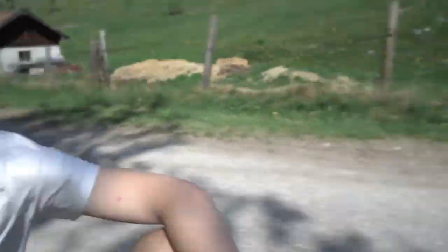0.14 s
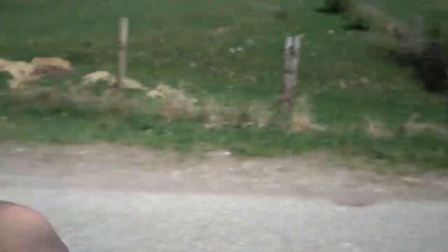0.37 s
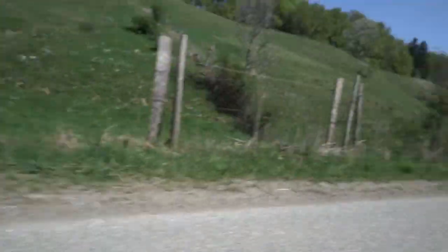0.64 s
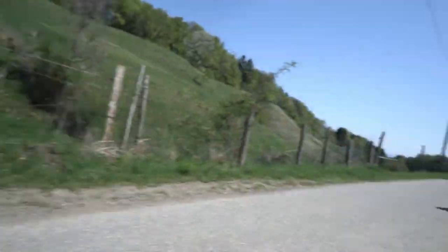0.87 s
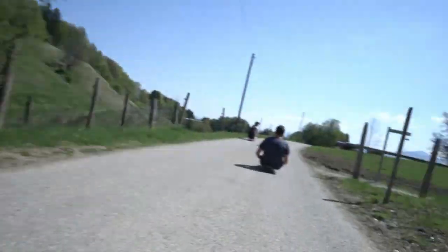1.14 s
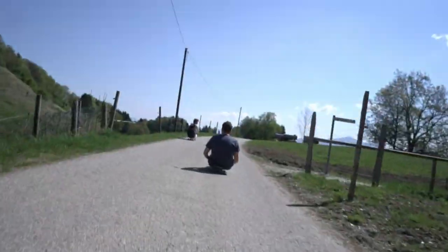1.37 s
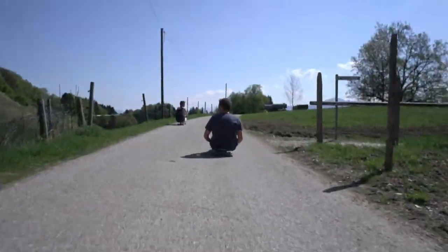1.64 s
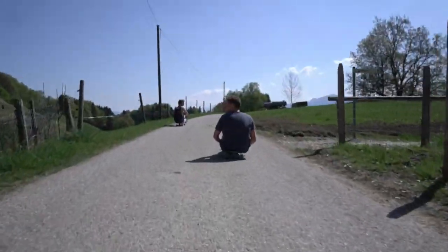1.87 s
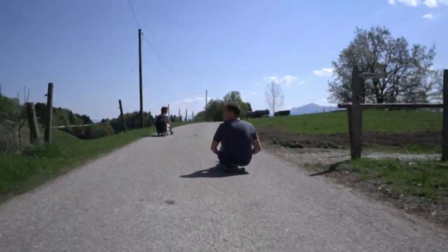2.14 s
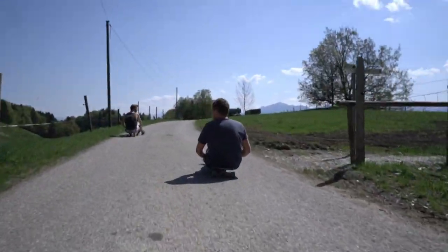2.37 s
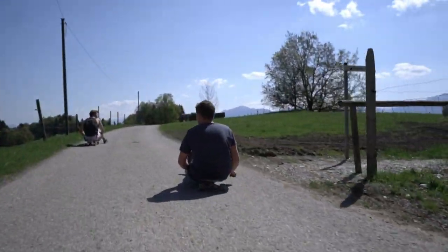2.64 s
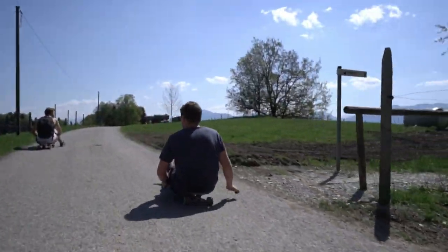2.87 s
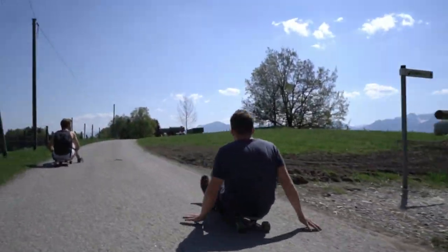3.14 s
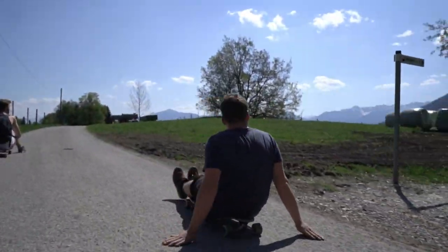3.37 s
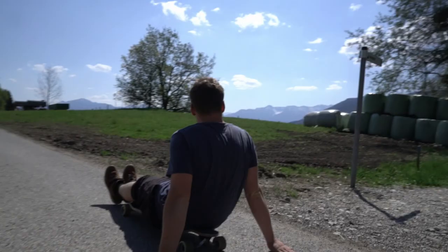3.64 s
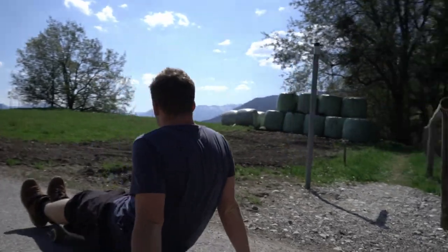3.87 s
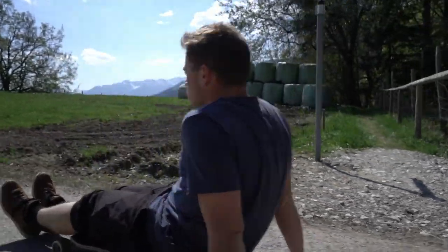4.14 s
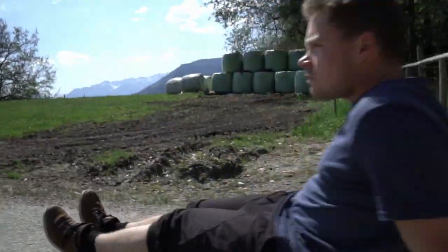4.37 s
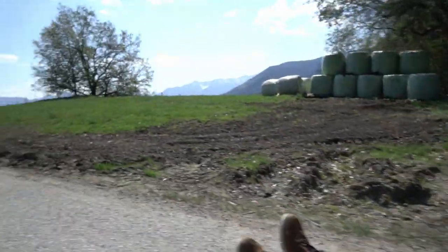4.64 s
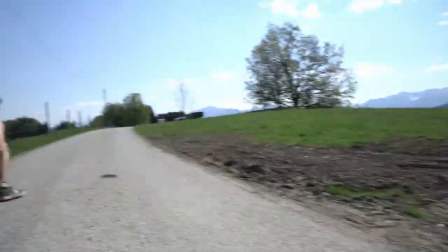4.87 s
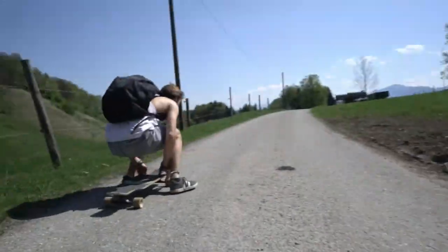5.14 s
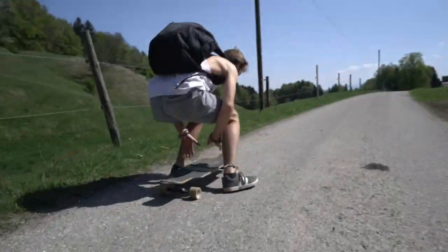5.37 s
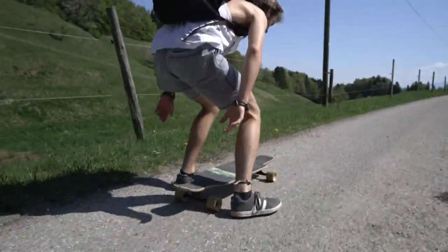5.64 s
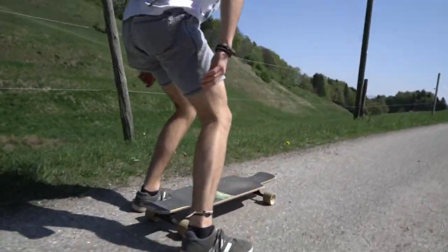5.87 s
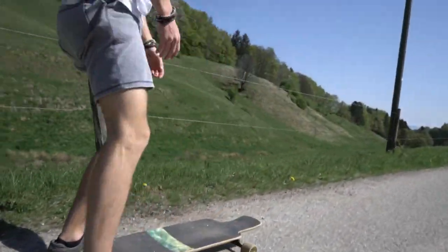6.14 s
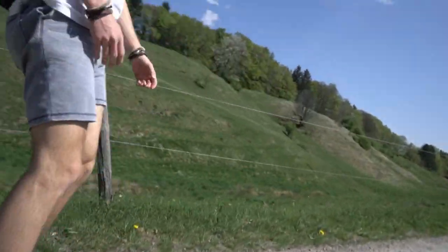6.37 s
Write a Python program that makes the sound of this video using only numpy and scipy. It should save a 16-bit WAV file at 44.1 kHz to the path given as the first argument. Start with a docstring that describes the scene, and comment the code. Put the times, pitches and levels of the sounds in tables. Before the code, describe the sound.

Close, wind-blasted stereo sound from a moving longboard in open country, without echo. Low lumpy roar and ragged gusts surge and sag, with loud pops on one side or the other. The hollow deck drums steadily over stony road. A cluster of bumps comes mid-ride, then a faint airy scuff with thin whistle, a brief lull in rolling, and finally coarse rattle, grit ticks and metallic knocks.

```python
"""Open country, coarse asphalt: a camera with two microphone ports rides along on a longboard.
Wind bursts, pops and roars on the ports: filtered patter and noise, pressure steps and low noise.
Road stones and bumps are random clicks and short jolts that ring the deck, trucks and bearings.
Grit hisses and ticks under the treads as coloured noise and short puffs.
Nearby, another board scuffs and whistles past, and late on one rattles alongside."""
import sys
import numpy as np
from scipy import signal
from scipy.io import wavfile
from scipy.ndimage import uniform_filter1d

SR = 44100
rng = np.random.default_rng(int(sys.argv[2]) if len(sys.argv) > 2 else 0)


def nominal_scale(level):
    """Amplitude ratio for a level in decibels (scalar or array-like)."""
    x = np.asarray(level, float) / 20
    return 10 ** x


def persist_wave(psi):
    """Save psi, clipped to +-1, as 16-bit WAV."""
    counts = np.round(np.clip(psi, -1, 1) * 32767).astype(np.int16)
    wavfile.write(sys.argv[1], SR, np.atleast_2d(counts).T)


N = 286647

# resonances of the deck: f/Hz, width/Hz, level/dB
DECK_MODES = [(322, 63, 3.5), (567, 92, 5), (610.3, 142, -1.5), (787, 11.3, -5), (968, 163, -10.5)]
# rattle resonances of the bearings: f/Hz, width/Hz, level/dB
BEARING_MODES = [(2530, 400, 17.5), (2740, 860, 16)]
# eddies are sharp while the camera stands side-on to the wind:
# t/s, sharpness/(dB per octave, well above 300 Hz)
EDDY_SHARPNESS = [(0.0, -3), (0.3, -4), (0.7, 0.5), (1.6, -4.5), (1.8, -9.5), (4.0, -16.5), (4.8, -13),
                  (5.3, -7), (6.5, -26)]


def evened(x):
    """Scales to rms 1."""
    return x / np.sqrt(np.mean(x ** 2) + 1e-20)


def read(points, hz):
    """Reads a spectrum on a log-frequency axis."""
    f, value = np.transpose(points)
    return np.interp(np.log(hz + 1), np.log(f + 1), value)


def curves(rows, t):
    """Every column of a table at the times t."""
    s, *columns = np.transpose(rows)
    return [np.interp(t, s, column) for column in columns]


def panned(x, pan_db):
    """Two channels, the left pan_db stronger relative to the right."""
    return x * nominal_scale(np.array([[pan_db / 2], [-pan_db / 2]]))


def add(mix, s, sound):
    """Adds a two-channel sound at time s."""
    part = mix[:, round(s * SR):][:, :sound.shape[1]]
    part += sound[:, :part.shape[1]]


def resonate(x, hz, *widths):
    """Shifts the curve hz down to zero, smooths, and shifts back: a resonance of gain 1."""
    turn = np.exp(2j * np.pi * np.cumsum(hz * np.ones(x.shape[-1])) / SR)
    low = x * turn.conj()
    for r in np.exp(-np.pi * np.array(widths) / SR):
        low = signal.lfilter([1 - r], [1, -r], low)
    return 2 * (turn * low).real


def ring(x, modes):
    """Excites steep-sided resonances side by side, each with its own level."""
    return sum(nominal_scale(db) * resonate(x, hz, w, 2 * w) for hz, w, db in modes)


def stones(per_s, spread_db, clump_s, clump_db):
    """Random clicks of either sign and uneven size, larger where the asphalt is coarser."""
    hit = (rng.random(N) < per_s / SR) * rng.choice([-1., 1.], N)
    coarse = evened(uniform_filter1d(rng.standard_normal(N), int(clump_s * SR)))
    size_db = spread_db * np.minimum(rng.exponential(1, N), 5)
    return evened(hit * nominal_scale(size_db + clump_db * np.clip(coarse, -2, 1.5)))


def shaped(colour_db, same, size, patch_db, flicker_db):
    """Two-channel noise from short-time spectra with patches and a flicker shared by all bins."""
    frames, hz = 4 * N // size + 5, np.fft.rfftfreq(size, 1 / SR)
    a, b, c, d, p = rng.standard_normal((frames, len(hz), 5)).T
    patches = evened(uniform_filter1d(uniform_filter1d(p, 9, 0), 7, 1))
    flicker = evened(uniform_filter1d(rng.standard_normal(frames), 4))
    same, left = np.clip(same, -1, 1), a + 1j * b
    right = same * left + np.sqrt(1 - same ** 2) * (c + 1j * d)
    z = np.array([left, right])
    z *= nominal_scale(colour_db(hz)[:, None] + patch_db * patches + flicker_db * flicker)
    return evened(signal.istft(z, nperseg=size, noverlap=3 * size // 4)[1][:, :N])


def passing(t):
    """A second board slides past: a wide treble scuff, a grainy scrape and a thin fuzzy whistle."""
    # the pass: t/s, scuff level/dB, scuff centre f/Hz, whistle level/dB
    pass_points = [(3.3, -90, 9000, -75), (3.6, -56, 10000, -66), (3.8, -68, 9500, -65),
                   (4.4, -61.5, 10900, -65.5), (4.5, -59, 10300, -62.5), (4.74, -60, 10200, -63),
                   (4.79, -53, 8040, -90), (4.87, -56, 8340, -91), (5.0, -42, 8980, -85),
                   (5.05, -78, 8800, -85)]
    scuff_db, hz, whistle_db = curves(pass_points, t)
    to_edge_s = np.minimum(t - pass_points[0][0], pass_points[-1][0] - t)
    near = np.clip(to_edge_s / 0.26, 0, 1)
    air = rng.standard_normal((2, N))
    scuff = evened(resonate(resonate(air, hz, 1800), hz, 2400))
    whistle = evened(resonate(air, 5400, 480, 720))
    grains = stones(per_s=450, spread_db=3, clump_s=0.015, clump_db=5)
    scrape = evened(ring(grains, BEARING_MODES))
    return near * (nominal_scale(whistle_db + 6.0) * scrape + nominal_scale(scuff_db) * scuff + nominal_scale(whistle_db) * whistle)


def alongside(t):
    """Coarse wheel rattle of another board that rolls up late: clicks ring its resonances."""
    # resonances of that board: f/Hz, width/Hz, level/dB
    other_modes = [(802, 51, 7.5), (1110, 260, -8.5), (1970, 620, -19)]
    road = np.array([stones(per_s=900, spread_db=5.0, clump_s=0.016, clump_db=4.5) for _ in "LR"])
    rattle = evened(ring(road + 0.42 * road[::-1], other_modes))
    approach = np.interp(t, (5.39, 5.48), (0, 1))
    return approach * nominal_scale(-41.5) * rattle


def hissing(t, coarse):
    """Treads grind grit: coloured noise and faint puffs, louder while another board is alongside."""
    # hiss of the treads: t/s, level/dB (before coarse patches)
    hiss_points = [(0.0, -53), (0.12, -54), (0.26, -57.5), (1.25, -59), (1.36, -62), (1.6, -60.5),
                   (1.7, -57.5), (2.4, -55), (3.6, -54.5), (4.3, -52.5), (4.78, -51), (4.88, -58),
                   (5.16, -59.5), (5.6, -56), (6.3, -54), (6.5, -57.5)]
    # colour of the hiss: f/Hz, relative level/(dB per Hz)
    grit_colour = [(1500, 1), (3000, -21), (4000, -12), (5300, -6.5), (6700, -7), (7500, 1), (8300, -3),
                   (10500, -4.5), (13300, -6.5), (15800, -10.5)]
    hiss_db = curves(hiss_points, t)[0] + 1.5 * coarse
    hiss = shaped(lambda hz: read(grit_colour, hz), same=0.083, size=256, patch_db=2.5, flicker_db=2.0)
    fine = np.array([stones(per_s=260, spread_db=2.5, clump_s=0.04, clump_db=3) for _ in "LR"])
    fine = fine + 0.5 * fine[::-1]
    band = signal.butter(2, [3800, 9000], "band", fs=SR, output="sos")
    fine = evened(signal.sosfilt(band, fine))
    puff = rng.standard_normal(90) * np.hanning(90)  # smears each click into a short puff
    fine = evened(signal.oaconvolve(fine, puff[None], "same"))
    near = np.exp(-((t - 5.55) / 0.29) ** 2)  # the other board close by, centre and spread in s
    crackle_boost_db, near_hiss_db, near_hz = 8, -62.5, 5300
    own = nominal_scale(hiss_db) * (hiss + 0.25 * fine * nominal_scale(crackle_boost_db * near))
    near_hiss = evened(resonate(resonate(hiss, near_hz, 1800), near_hz, 2400))
    return own + nominal_scale(near_hiss_db) * near * near_hiss


def ticks():
    """Flicked grit: short decaying puffs of noise, each around its own pitch."""
    # ticks: t/s, peak level/dB, centre f/Hz, left minus right/dB
    tick_rows = [(0.075, -26, 4000, -9), (0.352, -37, 10500, -10), (0.5312, -42, 10000, -8),
                 (0.543, -41, 11500, -6), (0.549, -38, 7740, -7), (1.037, -45, 3600, 3),
                 (4.45, -34, 2500, 3), (4.474, -37, 2600, 3), (4.495, -33, 2900, 3), (4.624, -33, 2500, 3),
                 (4.702, -30, 2450, 5), (4.7795, -40, 8000, 3), (4.795, -32, 10500, 6),
                 (5.1512, -37.5, 7260, -9), (5.641, -35, 4540, -2), (5.766, -38.5, 5360, 0),
                 (5.777, -35, 5200, 0), (5.793, -33, 5000, 0.0), (5.813, -24.5, 10800, -1),
                 (5.861, -36, 5500, -2), (5.902, -31.5, 4300, -5), (5.92, -34.5, 5300, -2),
                 (5.936, -39, 5900, 4), (5.994, -35.5, 5200, 0), (6.279, -31, 3400, -8),
                 (6.448, -36, 4570, -4), (6.4767, -36, 4940, -4)]
    mix = np.zeros((2, N))
    t = np.arange(500) / SR
    envelope = np.exp(-t / 0.003) * np.minimum(t / .0015, 1)
    noises = rng.standard_normal((len(tick_rows), 2, 500))
    for (s, db, hz, pan_db), noise in zip(tick_rows, noises):
        puff = (noise[0] + .5 * noise) * envelope  # partly alike on both ports
        tone = resonate(resonate(puff, hz, .35 * hz), hz, .5 * hz)
        tick = tone + 0.2 * np.diff(puff, prepend=0) + .12 * puff
        add(mix, s, panned(nominal_scale(db) * tick / abs(tick).max(), pan_db))
    return mix


def knocks():
    """Each bump is a short jolt: the deck booms, the trucks clink, grit sprays."""
    # bumps: t/s, deck peak level/dB, truck clink peak level/dB
    knock_rows = [(1.828, -15.5, -48), (2.186, -13.5, -38), (2.399, -12, -26), (2.607, -14.5, -41),
                  (2.655, -12.5, -53), (2.72, -16.5, -48), (2.746, -24, -39), (2.889, -16, -39),
                  (5.157, -15.5, -32), (5.596, -31, -47), (5.69, -18, -22), (5.712, -14, -31),
                  (5.813, -10.5, -19.5), (5.827, -9, -24), (6.186, -12, -33), (6.28, -13, -20),
                  (6.308, -15, -35), (6.375, -24, -32), (6.421, -15, -34), (6.432, -15, -32)]
    # trucks under a blow: f/Hz (before a random shift), width/Hz, level/dB
    clink_modes = [(910, 730, 7), (1485, 140, 17), (1870, 890, 6.5), (2900, 550, 4.5)]
    mix = np.zeros((2, N))
    t = np.arange(1600) / SR
    decay = np.exp(-t / .011)
    rise = np.minimum(t / .0012, 1)
    for (s, deck_db, clink_db), jolt in zip(knock_rows, rng.standard_normal((len(knock_rows), 1600))):
        blow = jolt * decay ** 1.27 * rise
        shifts = 0.01 * jolt.reshape(16, -1).sum(1) / 2  # no two blows land alike
        clink = [(hz * (1 + shift), w, db) for shift, (hz, w, db) in zip(shifts, clink_modes)]
        parts = ring(blow, DECK_MODES), ring(blow, clink), jolt * decay * rise
        levels_db = deck_db, clink_db, clink_db - 10.5  # the spray lies under the clink
        knock = sum(nominal_scale(db) * part / abs(part).max() for db, part in zip(levels_db, parts))
        add(mix, s, knock[None])
    return mix


def board(t, coarse):
    """Road stones and bumps strike the deck; trucks and bearings rattle along with them."""
    # rolling: t/s, deck drumming level/dB, bearing rattle level/dB (before coarse patches)
    roll_points = [(0.0, -28, -50), (0.25, -29.5, -54.5), (1.0, -29.5, -57), (1.5, -29, -62),
                   (1.8, -27, -56), (2.8, -28.5, -56), (3.25, -32, -56.5), (3.5, -30.5, -55.5),
                   (4.25, -29, -54), (4.75, -29.5, -56.5), (5.0, -33, -64), (5.25, -37.5, -64),
                   (5.5, -30.5, -50), (5.9, -33, -55), (6.25, -26.5, -54), (6.5, -33.5, -54.5)]
    # ring of the trucks: f/Hz (before the wander), width/Hz, level/dB
    truck_modes = [(1329, 162, 0)]
    drum_db, rattle_db = curves(roll_points, t)
    rattle_db = rattle_db + 2.5 * coarse
    road = stones(per_s=1000, spread_db=2.0, clump_s=0.016, clump_db=1.5)
    other = stones(per_s=1800, spread_db=-3.5, clump_s=0.041, clump_db=6.5)
    both = road + 0.029 * np.array([other, -other])

    # deck and trucks shift in pitch as the rider's weight moves
    wander_window = np.hanning(int(0.22 * SR))
    load = 1 + 0.032 * evened(signal.fftconvolve(rng.standard_normal(N), wander_window, "same"))
    drum_modes = [(hz * load, w, db) for hz, w, db in DECK_MODES]
    loaded_trucks = [(hz * load, w, db) for hz, w, db in truck_modes]
    drum = nominal_scale(drum_db) * evened(ring(road, drum_modes))
    trucks = nominal_scale(rattle_db + 8.5) * evened(ring(both, loaded_trucks))
    deck = drum + trucks + knocks()

    chatter = np.array([road, other - 0.25 * road]) + 0.27 * rng.standard_normal((2, N))
    rattle = nominal_scale(rattle_db) * evened(ring(chatter, BEARING_MODES))
    # the right port is 6 samples farther from the deck
    lagged = np.array([deck[0], np.pad(deck[1], (6, 0))[:N]])
    return panned(lagged + rattle, 2.0)


def gusts(t):
    """Level of the wind in dB: gusts snap up and sag, with random buffets."""
    # gusts: t/s, level/dB (before buffets)
    gust_points = [(0.0, -13), (0.98, -20.5), (1.0, -17), (1.68, -18.5), (1.74, -26.5), (2.1, -21),
                   (2.6, -29), (2.64, -22), (2.95, -32.5), (3.02, -17), (3.55, -27.5), (3.66, -21.5),
                   (4.4, -33), (4.76, -25.5), (4.8, -15.5), (4.88, -15.5), (4.92, -28.5), (5.01, -17),
                   (5.6, -20.5), (5.63, -17), (6.03, -26), (6.06, -18.5), (6.39, -31.5), (6.5, -24)]
    buffets = evened(uniform_filter1d(rng.standard_normal(N), int(0.043 * SR)))
    return curves(gust_points, t)[0] + 1.5 * buffets


def rumble(gust_db):
    """Large eddies press on both ports alike: a low lumpy roar that follows the gusts in part."""
    # colour of the roar: f/Hz, relative level/(dB per Hz)
    roar_colour = [(20, -57), (45, -6.5), (100, 0.5), (200, -1.5), (260, -9.5), (400, -12), (600, -34.5),
                   (1000, -95)]
    roar = shaped(lambda hz: read(roar_colour, hz), same=0.97, size=1024, patch_db=2.3, flicker_db=-1.0)
    follows = 0.55  # dB per dB of gust
    return nominal_scale(-22.5 + follows * (gust_db + 19.5)) * roar


def pop(size_ms):
    """A sharp pressure step riding on a slower push."""
    t = np.arange(-300, 301) / SR
    step = t / (size_ms / 1000)
    push = step / 1.79
    shape = -step * np.exp(-step ** 2 / 2) - 4.5 * push * np.exp(-push ** 2 / 2)
    return shape / abs(shape).max()


def pops(t, gust_db):
    """Eddies break on the ports: loud pops, and small ones that crackle more as eddies sharpen."""
    # loud pops: t/s, peak level/dB, left minus right/dB, size/ms
    pop_rows = [(0.2865, -18, -1, 0.12), (0.4205, -19, 3, 0.12), (0.5696, -21, -14, 0.13),
                (0.634, -16, -14, 0.13), (0.6484, -16, -14, 0.17), (0.695, -8.5, -6, 0.27),
                (0.7356, -14, -15, 0.12), (1.1032, -12, 6, 0.42), (1.118, -11, 11, 0.29),
                (1.153, -18, 16, 0.14), (1.178, -18.5, 17, 0.16), (1.2458, -9.5, 14, 0.21),
                (1.265, -12, 9, 0.14), (1.552, -14.5, -12, 0.21), (3.112, -22, 0, 1.93),
                (5.492, -8.5, -1, 0.35), (5.63, -17, -3, 0.8), (6.067, -6.5, 1, 0.31),
                (6.079, -18, -2, 1.2)]
    small = np.array([stones(per_s=600, spread_db=3.5, clump_s=.03, clump_db=4) for _ in "LR"])
    small = evened(signal.oaconvolve(small, np.diff(pop(0.15))[None], "same"))
    sharpness = curves(EDDY_SHARPNESS, t)[0]
    mix = nominal_scale(gust_db - 16.5 + 1.57 * sharpness) * small
    for s, db, pan_db, size_ms in pop_rows:
        add(mix, s - 300 / SR, panned(nominal_scale(db) * pop(size_ms)[None], pan_db))  # centred on s
    return mix


def wind(t, gust_db):
    """Eddies burst on each port by itself, the largest on both; sharper gusts reach higher."""
    # colour of the eddies: f/Hz, relative level/(dB per Hz, before sharpness)
    eddy_colour = [(20, -46), (40, -15.5), (107, 4), (200, 3.5), (260, 3.5), (455, 2), (1070, -12),
                   (2190, -44), (3000, -56), (5000, -87)]
    shared_hz = 90  # below this, eddies are large enough to cover both ports
    patter = np.array([stones(per_s=160, spread_db=4, clump_s=.04, clump_db=3) for _ in "LR"])
    rush = 0.42 * rng.standard_normal((2, N))
    hz, at, z = signal.stft(patter + rush, SR, nperseg=1024, noverlap=768)
    hz = hz[:, None]
    z *= nominal_scale(read(eddy_colour, hz) + curves(EDDY_SHARPNESS, at)[0] * np.log2(1 + hz / 300))
    z += (np.sqrt(2) * z.mean(0) - z) / (1 + (hz / shared_hz) ** 2)
    air = signal.istft(z, nperseg=1024, noverlap=768)[1][:, :N]
    air /= np.sqrt(uniform_filter1d((air ** 2).mean(0), SR // 8))  # levelled, so the gusts set the level
    widened = air - 0.066 * air[::-1]  # stereo widening: each channel loses a little of the other
    return nominal_scale(gust_db) * widened


def scene():
    """All sources at the two ports; coarser patches of asphalt lift metal ring and hiss together."""
    t = np.arange(N) / SR
    gust_db = gusts(t)
    patch_window = np.hanning(int(0.041 * SR))
    coarse = evened(signal.fftconvolve(rng.standard_normal(N), patch_window, "same"))
    others = passing(t) + alongside(t)
    ride = hissing(t, coarse) + ticks() + board(t, coarse)
    return others + ride + rumble(gust_db) + pops(t, gust_db) + wind(t, gust_db)


def band_limit(x):
    """A steep low-pass at the top of the band."""
    return signal.sosfilt(signal.butter(12, 15830, fs=SR, output="sos"), x)


def record(dry):
    """At the microphones: a narrow dip in the bass, then a soft ceiling on the hardest pushes."""
    dipped = dry - 0.6 * resonate(dry, 164.8, 20.8)
    mix = 0.77 * np.tanh(dipped / 0.79)
    return band_limit(mix)


dry = scene()
out = record(dry)
persist_wave(out)
```